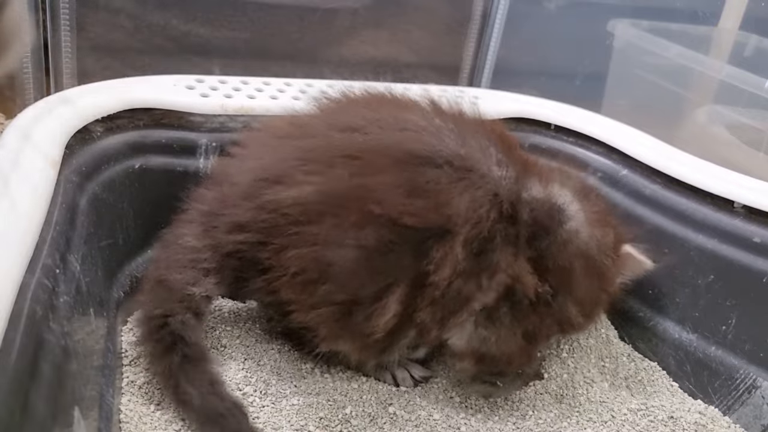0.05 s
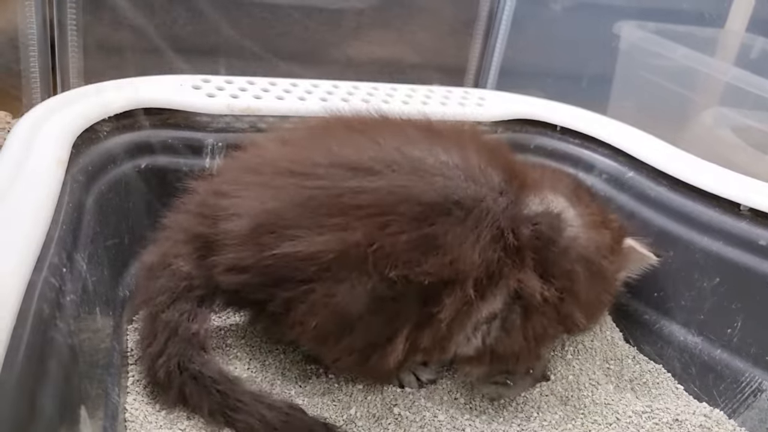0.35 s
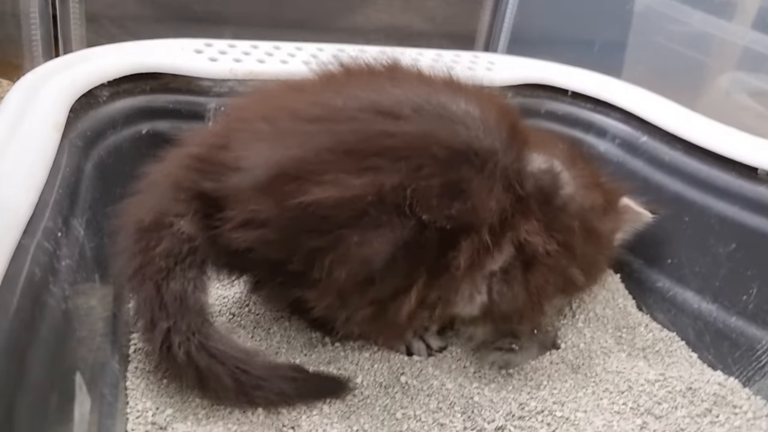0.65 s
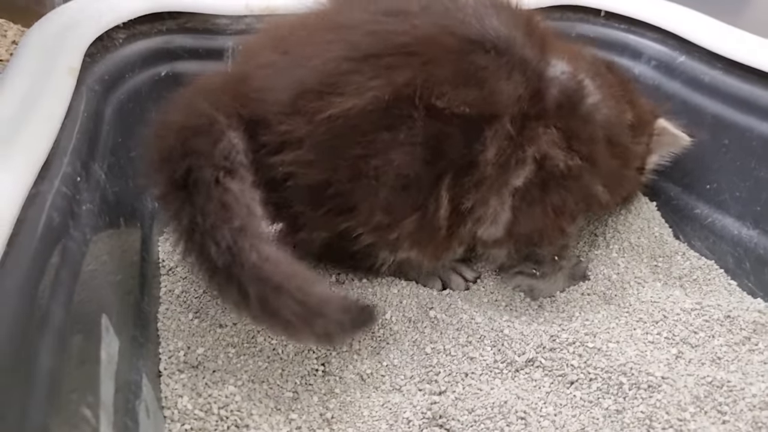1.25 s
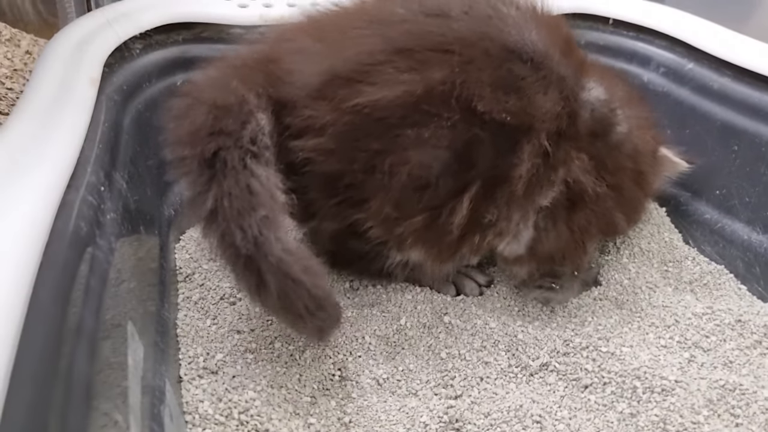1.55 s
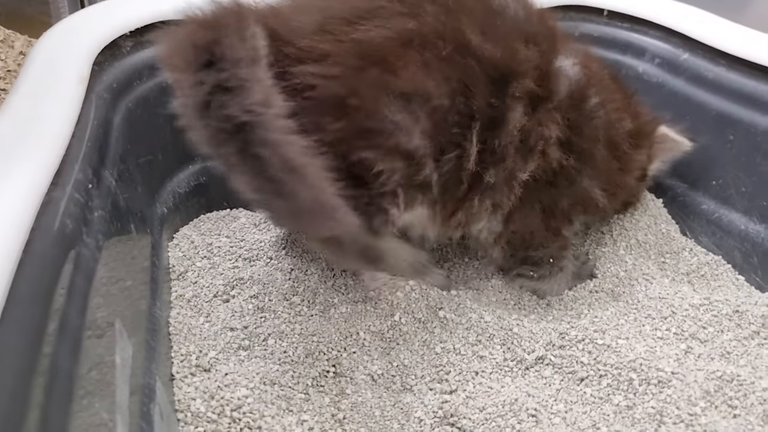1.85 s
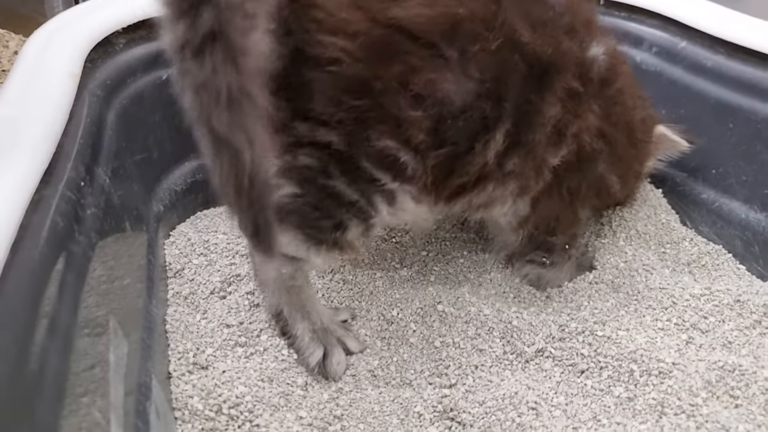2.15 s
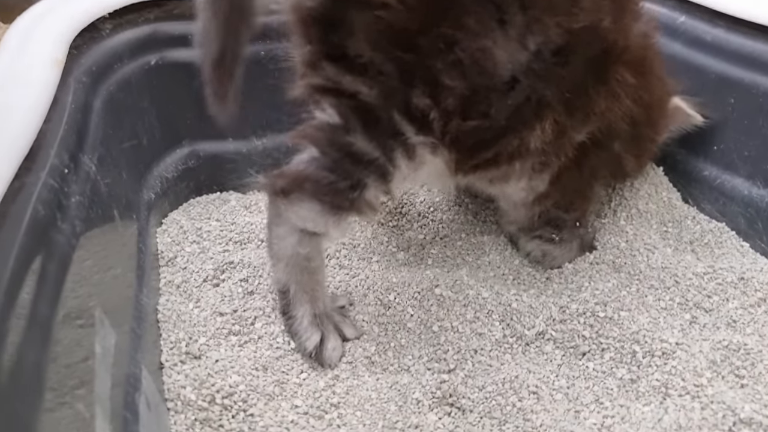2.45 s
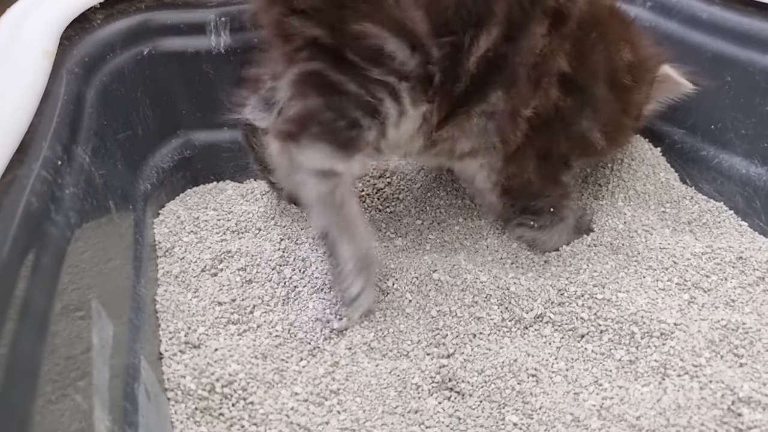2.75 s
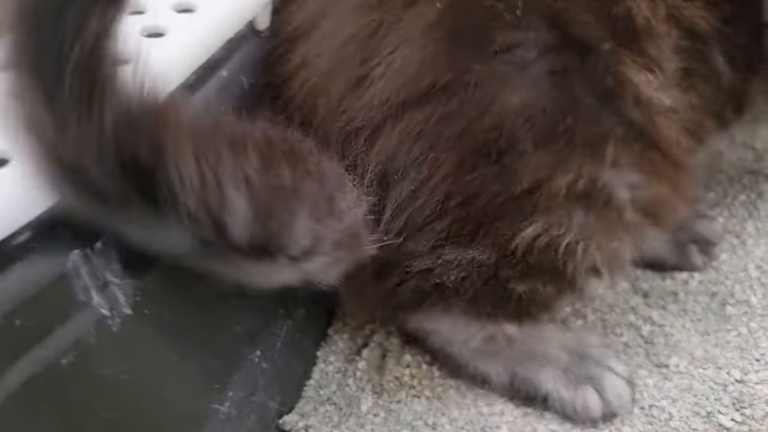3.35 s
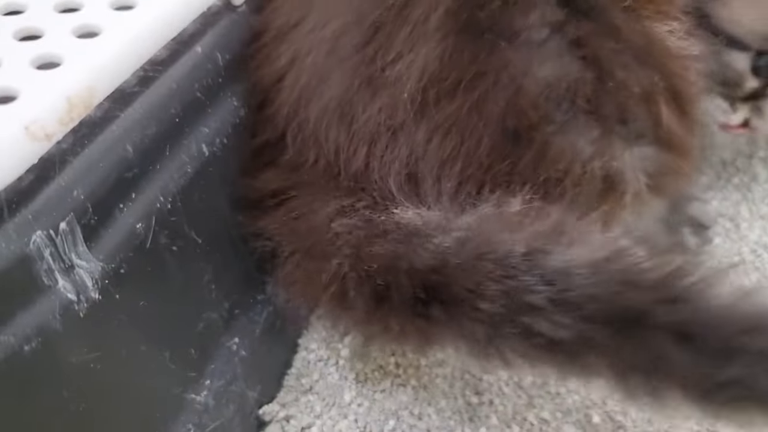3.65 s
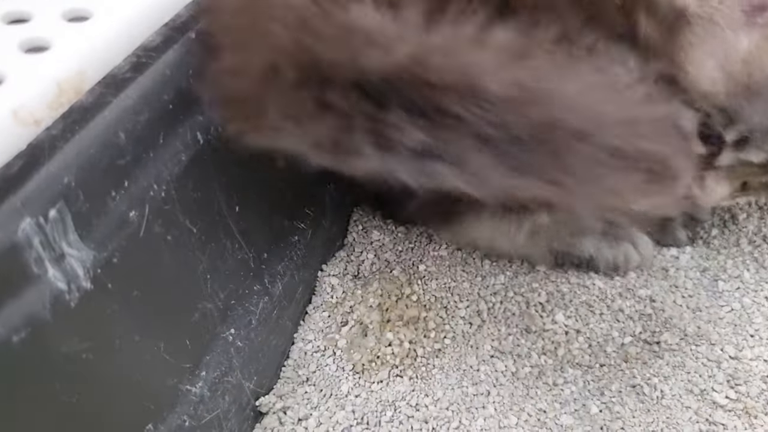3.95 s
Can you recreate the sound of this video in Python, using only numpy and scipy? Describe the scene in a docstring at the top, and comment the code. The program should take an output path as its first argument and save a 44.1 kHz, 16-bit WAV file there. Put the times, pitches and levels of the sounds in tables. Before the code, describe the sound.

A kitten scratches through gritty litter close by, its paws bumping the plastic box.

```python
"""Crunching, scraping litter, close by: a kitten paws about in a plastic tub in a small quiet room.
Each stroke makes grains slip, clink and rub the tub; single grains snap, with a few high squeaky rings.
Paws knock on the wall and set the tub ringing, hardest near the end. Behind this a small piece of
metal tinkles faintly and a thin high whistle glides by, over a low hum and soft hiss."""
import sys
import numpy as np
from scipy import signal
from scipy.fft import rfft, irfft
from scipy.io import wavfile
from scipy.ndimage import uniform_filter1d

SR = 44100
rng = np.random.default_rng(int(sys.argv[2]) if len(sys.argv) > 2 else 0)


def wav_record(signal):
    """Record a signal, one row per channel, as 16-bit PCM in the file named by sys.argv[1]."""
    frames = np.transpose(np.atleast_2d(signal))
    bounded = np.clip(frames, -1, 1)
    # unit amplitude maps onto the largest positive 16-bit level
    quanta = np.round(bounded * 32767).astype(np.int16)
    wavfile.write(sys.argv[1], SR, quanta)


N = 176400
T = np.arange(N) / SR


def from_db(db):
    """Decibels to gain."""
    return 10 ** (np.asarray(db) / 20)


def unit_rms(x):
    """Scale to rms 1."""
    return x / np.sqrt(np.mean(x ** 2) + 1e-20)


def pan_gains(left_minus_right_db):
    """Constant-power stereo gains."""
    return unit_rms(from_db([[left_minus_right_db / 2], [-left_minus_right_db / 2]]))


def gain_at(spectrum, hz):
    """Gain of a (Hz, dB) spectrum, interpolated in log frequency."""
    points_hz, db = np.transpose(spectrum)
    return from_db(np.interp(np.log(hz + 1e-9), np.log(points_hz), db))


def bandpass(x, low_hz, high_hz, order=2):
    """Butterworth band-pass."""
    sos = signal.butter(order, [low_hz, min(high_hz, .47 * SR)], "band", fs=SR, output="sos")
    return signal.sosfilt(sos, x + 1e-18)


def ring(x, hz, t60_s):
    """One mode: a unit click starts a decaying sine of height 1."""
    r, w = from_db(-60 / (t60_s * SR)), 2 * np.pi * hz / SR
    return signal.lfilter([0, np.sin(w)], [1, -2 * r * np.cos(w), r * r], x + 1e-18)


def decay(t, t60_s):
    """1 until t = 0, then exponential decay."""
    return np.exp(-np.log(1000) * np.maximum(t, 0) / t60_s)


def add(out, start_s, x):
    """Mix a short sound in."""
    i = max(int(start_s * SR), 0)
    out[..., i:i + x.shape[-1]] += x[..., :N - i]


# Paw strokes: (start [s], rise [s], hold [s], crunch [dB], fine hiss [dB], tub rub [dB])
PAW_STROKES = [(-0.012, 0.039, 0.0045, -57.5, -73, -64), (0.049, 0.024, 0.0065, -59, -93, -60.5),
               (0.187, 0.0067, 0.019, -46.5, -81, -54.5), (0.213, 0.023, 0.04, -40.5, -48.5, -53),
               (0.335, 0.0019, 0.026, -56, -93, -63), (0.604, 0.03, 0.0052, -56, -63.5, -53.5),
               (0.662, 0.047, 0.036, -49.5, -67, -58), (0.738, 0.052, 0.035, -51.5, -62, -51.5),
               (0.819, 0.011, 0.14, -68, -79, -58.5), (0.996, 0.00098, 0.0042, -46.5, -52.5, -39.5),
               (1.125, 0.018, 0.0052, -56, -68.5, -59), (1.186, 0.043, 0.01, -53, -69, -64),
               (1.244, 0.017, 0.036, -44.5, -61.5, -52.5), (1.285, 0.016, 0.071, -60.5, -69.5, -60.5),
               (1.355, 0.035, 0.018, -55.5, -66, -54.5), (1.616, 0.043, 0.077, -59.5, -67, -54),
               (1.693, 0.016, 0.069, -57.5, -90, -56), (1.804, 0.018, 0.068, -64.5, -77, -66),
               (1.995, 0.0045, 0.04, -74, -59, -67), (2.118, 0.022, 0.0074, -57, -92, -59.5),
               (2.23, 0.063, 0.047, -63, -71.5, -54.5), (2.354, 0.025, 0.031, -63, -85, -56.5),
               (2.446, 0.002, 0.08, -54, -74, -60), (2.804, 0.0087, 0.022, -60, -96, -75),
               (2.865, 0.012, .04, -67, -96, -59), (3.095, 0.027, 0.07, -57.5, -62.5, -57.5),
               (3.191, 0.018, 0.07, -61, -73, -61.5), (3.277, 0.048, 0.19, -65.5, -71, -77),
               (3.407, 0.021, 0.0033, -52, -51.5, -55), (3.434, 0.0043, 0.036, -53.5, -63.5, -34),
               (3.715, 0.039, 0.2, -76.5, -85, -69.5)]
# Spectra of crunch, fine hiss and tub rub: (frequency [Hz], relative density [dB])
CRUNCH_SPECTRUM = [(400, -21), (750, 3.5), (1100, 8.5), (1600, 6.5), (2300, 4), (4200, -3), (6500, -10.5),
                   (8000, -10), (10000, -54), (15500, -66)]
HISS_SPECTRUM = [(2600, -11), (4400, -5.5), (7000, 2), (8500, -15), (10500, -14.5), (13000, -10),
                 (15500, -11.5)]
RUB_SPECTRUM = [(100, -0.5), (170, -4), (280, -4), (420, 2.5), (540, 10.5), (700, -11.5), (950, -17),
                (1600, -41)]


def scrapes(grains_per_s=710, reference_db=-49, rubs_per_s=700):
    """Each paw stroke swells, holds and dies away; a harder stroke moves more grains."""
    power = np.zeros((3, 2, N))
    for start_s, rise_s, hold_s, *levels_db in PAW_STROKES:
        attack = np.clip((T - start_s) / max(rise_s, .002), 0, 1)
        push = attack * decay(T - start_s - rise_s - hold_s, t60_s=0.059)
        for layer, db in zip(power, levels_db):
            layer += (push * from_db(db)) ** 2
    crunch_env, hiss_env, rub_env = np.sqrt(power)
    slips_per_s = grains_per_s * (crunch_env[0] / from_db(reference_db) + 0.1) ** .6
    crunch = crunch_env * from_db(-1.5) * grains(slips_per_s, CRUNCH_SPECTRUM) + clinks(crunch_env)
    hiss = hiss_env * grains(slips_per_s, HISS_SPECTRUM)
    rub = rub_env * pan_gains(-6.5) * grains(rubs_per_s, RUB_SPECTRUM)
    return crunch + hiss + rub


def grains(per_s, spectrum, size_spread_db=4, colour_spread_db=4, t60_s=0.017):
    """Grains slip at random, each a brief rattle with its own size and colour; rms 1."""
    slips = np.flatnonzero(rng.random(N) < per_s / SR)
    size = from_db(size_spread_db * np.minimum(rng.exponential(1, N), 4)) / np.sqrt(per_s)
    colour_db = colour_spread_db * rng.standard_normal(N)
    # two stereo noises for alternate bands, each partly common to left and right
    noises = rng.standard_normal((2, 2, N)) + .8 * rng.standard_normal((2, 1, N))
    out, edges_hz = 0, np.geomspace(100, 17000, 20)
    for k, (low_hz, high_hz) in enumerate(zip(edges_hz, edges_hz[1:])):
        clicks = np.zeros(N)
        clicks[slips] = size[slips] * from_db(np.roll(colour_db, 997 * k)[slips])  # new colour per band
        power = signal.lfilter([1], [1, -decay(2 / SR, t60_s)], clicks ** 2 + 1e-18)
        rattle = bandpass(unit_rms(np.sqrt(power)) * noises[k % 2], low_hz, high_hz)
        out += gain_at(spectrum, np.sqrt(low_hz * high_hz)) * rattle
    return unit_rms(out)


# Coarse grains ringing against the tub: (pitch [Hz])
CLINK_PITCHES_HZ = [1122, 1817, 2260, 2734, 3100, 3800, 4086, 4350, 5600]


def clinks(force, per_s=870, t60_s=0.046, relative_db=-8):
    """Coarse grains catch and let go, each ringing at one pitch; the level follows the force."""
    caught = rng.random(N) < per_s / SR
    pitch_index = rng.integers(0, len(CLINK_PITCHES_HZ), N)
    clicks = caught * rng.standard_normal((2, N))
    out, at_unit_force = 0, 0
    for k, hz in enumerate(CLINK_PITCHES_HZ):
        hits = clicks * (pitch_index == k) * gain_at(CRUNCH_SPECTRUM, hz) * np.sqrt(hz)
        out += ring(hits * force, hz, t60_s)
        at_unit_force += ring(hits, hz, t60_s)
    return from_db(relative_db) * out / np.std(at_unit_force)


# Single grains: (time [s], level before trim [dB], centre [Hz])
GRAIN_SNAPS = [(0.074, -55, 2040), (0.193, -63, 2620), (0.302, -42, 1100), (.341, -49, 2300),
               (0.445, -46.5, 1860), (0.905, -39.5, 3050), (1, -39, 3300), (1.224, -39, 2820),
               (1.573, -44, 3000), (1.665, -49.5, 11300), (2.018, -59, 6000), (2.255, -46.5, 1210),
               (2.382, -37, 1680), (2.455, -33, 2800), (2.471, -34, 2920), (2.5, -39.5, 3000),
               (2.592, -47.5, 1200), (2.809, -46, 2570), (3.184, -42, 2030), (3.267, -43.5, 5100),
               (3.738, -57.5, 3140), (3.808, -50.5, 1020), (3.895, -60.5, 6300)]


def snaps(t60_s=0.026, edge_ratio=1.61, trim_db=-20):
    """A grain snaps or hits the wall: a short burst of band noise."""
    out, t = np.zeros((2, N)), T[:SR // 20]
    for start_s, db, hz in GRAIN_SNAPS:
        burst = rng.standard_normal((2, len(t))) * decay(t, t60_s)
        burst = bandpass(burst, hz / edge_ratio, hz * edge_ratio)
        add(out, start_s, from_db(db + trim_db) * unit_rms(burst))
    return out


# Paw knocks: (time [s], flex peak [dB], settled pitch [Hz], pan L-R [dB])
PAW_KNOCKS = [(0.606, -43, 510, -22), (0.907, -30.5, 487, -6), (1.001, -29, 468, -11),
              (1.004, -46.5, 185, -2), (1.531, -45, 510, -6), (2.274, -45, 545, 1), (2.297, -40.5, 560, 2),
              (2.313, -45, 535, 9), (2.594, -45.5, 454, -5), (3.119, -38, 188, -6.5),
              (3.144, -30, 353, -14), (3.155, -30, 317, -5), (3.4438, -13, 306.4, 3.5),
              (3.462, -26, 173, -2), (3.463, -21, 667, -2.5), (3.47, -24.5, 365, -3)]
# Tub modes: (frequency [Hz], relative level [dB], t60 [s])
TUB_MODES = [(110, -2, 0.28), (154, -4.5, 0.38), (213, -16, 0.49), (262, -5, 0.25), (480, -9.5, 0.071),
             (529, -5, 0.06), (762, 1.5, 0.067)]


def knocks(t60_cycles=4.22, stiffening=5.8, settle_s=0.0014, softness_hz=710, ring_db=-7):
    """A soft paw flexes the wall, higher in pitch at first the harder it lands, and the tub rings."""
    out, t = np.zeros((2, N)), T[:SR // 2]
    soft_paw = signal.butter(4, softness_hz, fs=SR, output="sos")
    for start_s, db, hz, pan_db in PAW_KNOCKS:
        pitch_hz = hz * (1 + stiffening * from_db(db) * np.exp(-t / settle_s))
        envelope = t * hz * decay(t, t60_cycles / hz)
        flex = signal.sosfilt(soft_paw, envelope * np.sin(2 * np.pi * np.cumsum(pitch_hz) / SR))
        flex /= np.abs(flex).max()
        body = 0
        for k, (mode_hz, mode_db, t60_s) in enumerate(TUB_MODES):
            gains = (-1) ** k * from_db(mode_db + rng.normal(0, 0.25, (2, 1)))
            body += gains * ring(flex, mode_hz, t60_s)
        knock = flex + from_db(ring_db) * body / np.abs(flex).sum()
        add(out, start_s, from_db(db) * pan_gains(pan_db) * knock)
    return out


# Brief high squeaky rings: (start [s], level [dB], pitch [Hz])
SQUEAKY_RINGS = [(0.673, -54.5, 4086), (2.46, -60, 4870), (2.811, -63.5, 3100), (2.862, -73.5, 4840)]


def squeaky_rings():
    """Brief high squeaky rings; those near 4840 Hz are the small metal piece ringing."""
    out = np.zeros((2, N))
    for start_s, db, hz in SQUEAKY_RINGS:
        add(out, start_s, from_db(db) * chatter(hz, swell_s=0.019, t60_s=0.035))
    return out


def chatter(hz, swell_s, t60_s, touches_per_s=460):
    """A run of light touches swells and fades, ringing one mode roughly; rms near 1 at its height."""
    t = T[:SR // 2]
    touches = (rng.random(len(t)) < touches_per_s / SR) * t * np.exp(-t / swell_s)
    ringing = ring(touches * rng.standard_normal((2, len(t))), hz, t60_s)
    return unit_rms(ringing) * np.sqrt(2 * swell_s * SR / len(t))


# Tinkles: (start [s], low modes [dB], high modes [dB])
METAL_TINKLES = [(1.634, -60.5, -66.5), (1.701, -61.5, -70.5), (1.879, -60.5, -70), (2.039, -64.5, -79),
                 (2.344, -62.5, -60.5), (2.474, -74, -69.5)]
# Metal modes: (frequency [Hz], relative level [dB])
METAL_LOW_MODES = [(4840, -10), (5690, 0)]
METAL_HIGH_MODES = [(10160, -3), (11660, -2)]


def tinkles():
    """Runs of light touches make a small piece of metal shimmer."""
    out = np.zeros((2, N))
    for start_s, low_db, high_db in METAL_TINKLES:
        for db, modes in ((low_db, METAL_LOW_MODES), (high_db, METAL_HIGH_MODES)):
            for hz, mode_db in modes:
                add(out, start_s, from_db(db + mode_db) * chatter(hz, swell_s=0.02, t60_s=0.07))
    return out


# Whistle contour: (time [s], pitch [Hz], level [dB])
WHISTLE_CONTOUR = [(2.06, 12000, -92), (2.15, 11750, -86), (2.205, 12950, -83), (2.28, 13150, -81),
                   (2.34, 12500, -83), (2.44, 12100, -82), (2.53, 10200, -89), (2.63, 9300, -91)]


def whistle(glide_s=.03, jitter_hz=50, flutter_db=3.8):
    """A thin, slightly unsteady tone arches over and falls away."""
    times_s, hz, db = np.transpose(WHISTLE_CONTOUR)
    pitch_hz = uniform_filter1d(np.interp(T, times_s, hz), int(glide_s * SR))
    pitch_hz += jitter_hz * unit_rms(bandpass(rng.standard_normal(N), 22, 230))
    level_db = np.interp(T, times_s, db) + flutter_db * unit_rms(bandpass(rng.standard_normal(N), 18, 120))
    gate = (T > times_s[0]) * (T < times_s[-1])
    return from_db(level_db) * gate * np.sin(2 * np.pi * np.cumsum(pitch_hz) / SR)


# Room hiss: (frequency [Hz], relative density [dB])
AIR_SPECTRUM = [(30, -3), (110, -5), (260, -10), (550, -6), (950, -14), (2500, -21.5), (7200, -26),
                (8400, -43), (15500, -33)]


def background(air_db=-68, correlation=0.06, hum_db=-57.5, hum_hz=73.5, width_hz=14):
    """Soft room hiss and a low wavering hum of narrow-band noise."""
    white = rng.standard_normal((3, N))
    air = np.sqrt(1 - correlation) * white[:2] + np.sqrt(correlation) * white[2]
    air = irfft(rfft(air) * gain_at(AIR_SPECTRUM, np.arange(N // 2 + 1) * SR / N), N)
    hum = bandpass(rng.standard_normal(N + SR), hum_hz - width_hz / 2, hum_hz + width_hz / 2, order=1)
    hum = bandpass(hum[SR:], 41, 136)
    return from_db(air_db) * unit_rms(air) + from_db(hum_db) * unit_rms(hum)


def reflections(delay_s, t60_s):
    """Dense echoes: a stereo impulse response of decaying noise, unit energy per side on average."""
    t = T[:SR // 2]
    echoes = rng.standard_normal((2, len(t))) * decay(t, t60_s) * (t > delay_s)
    return echoes / np.sqrt(np.sum(echoes ** 2) / 2)


def tub_in_room(x, room_db, walls_db, antiphase_hz=480):
    """Direct sound, quick reflections from the tub walls and a short, duller room tail."""
    # all-pass on the right: above antiphase_hz the two microphone ports tend to opposite phase
    k = np.tan(np.pi * antiphase_hz / SR)
    a = (k - 1) / (k + 1)
    direct = np.array([x[0], signal.lfilter([a, 1], [1, a], x[1])])
    room = from_db(room_db) * bandpass(reflections(delay_s=.005, t60_s=0.28), 70, 7000, order=1)
    walls = from_db(walls_db) * reflections(delay_s=.001, t60_s=0.052)
    return direct + signal.fftconvolve(x, room + walls, axes=1)[:, :N]


def scene():
    """Litter and tub in the room, with the faint sounds around them."""
    litter = tub_in_room(scrapes() + snaps(), room_db=-12, walls_db=-4.5)
    tub = tub_in_room(knocks(), room_db=-15.5, walls_db=-4.0)
    return litter + tub + squeaky_rings() + tinkles() + whistle() + background()


def record(dry):
    """Steep low-pass at 15.9 kHz."""
    return signal.sosfilt(signal.ellip(10, .1, 70, 15900, fs=SR, output="sos"), dry)


dry = scene()
out = record(dry)
wav_record(out)
```